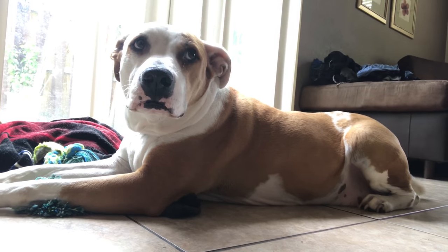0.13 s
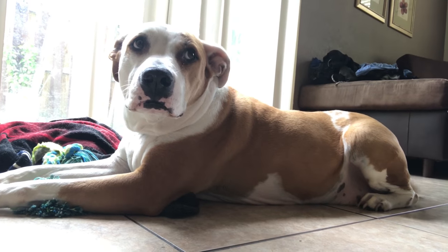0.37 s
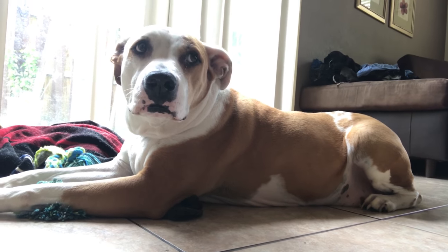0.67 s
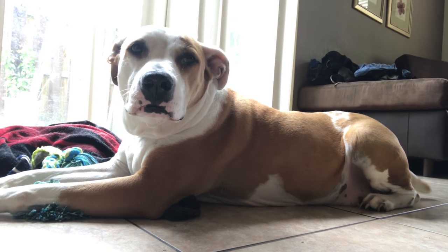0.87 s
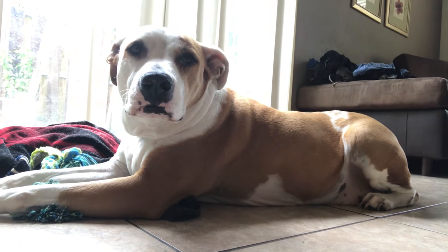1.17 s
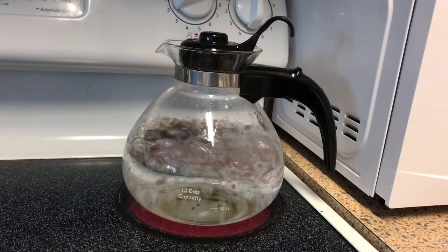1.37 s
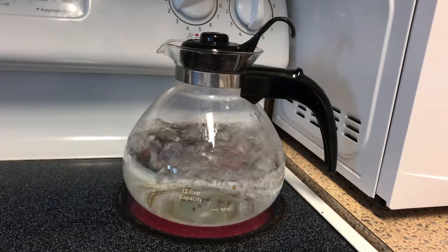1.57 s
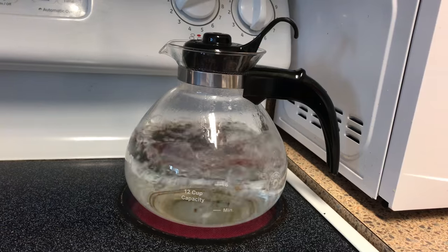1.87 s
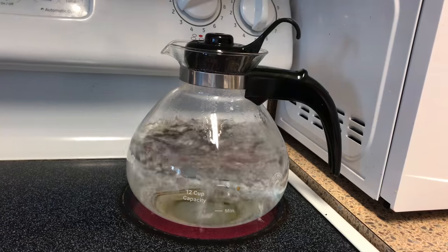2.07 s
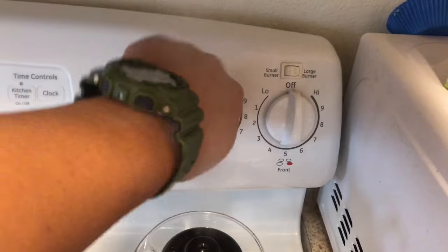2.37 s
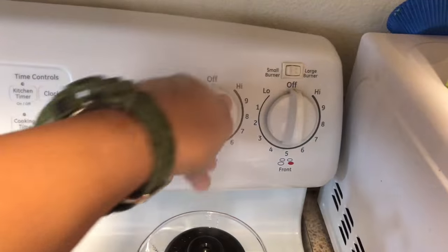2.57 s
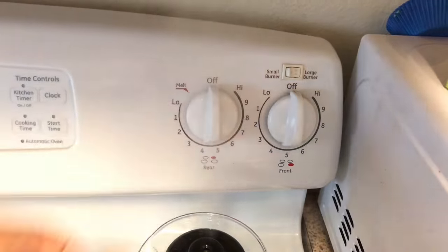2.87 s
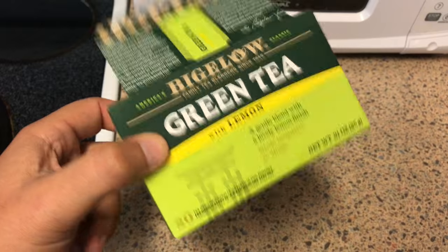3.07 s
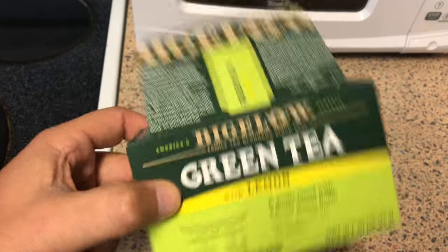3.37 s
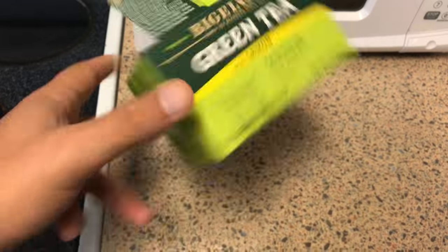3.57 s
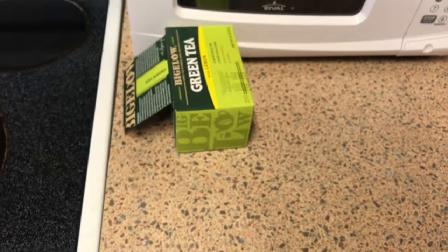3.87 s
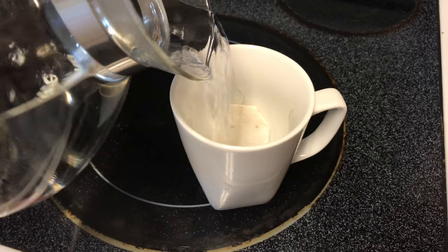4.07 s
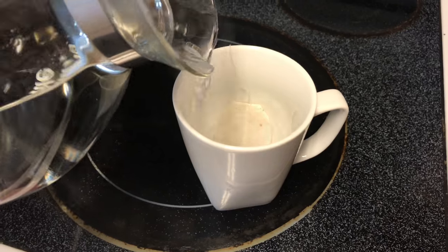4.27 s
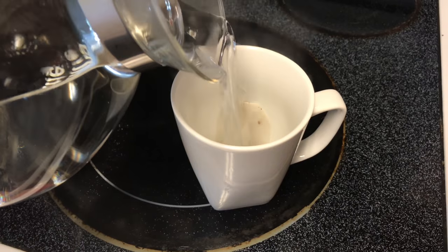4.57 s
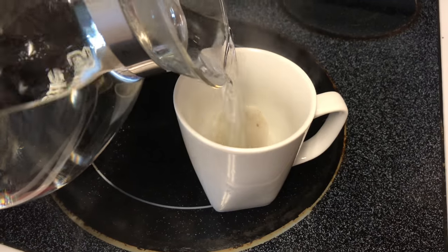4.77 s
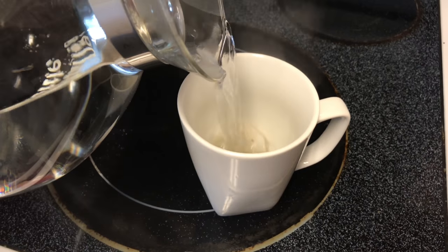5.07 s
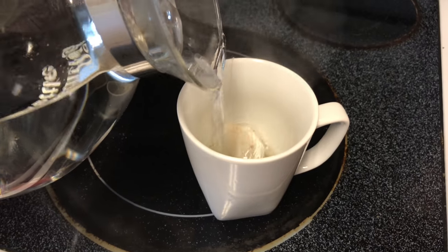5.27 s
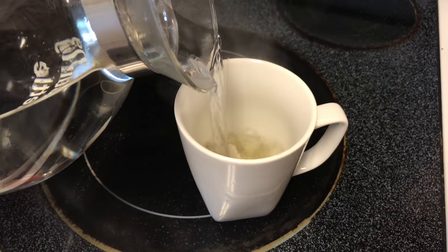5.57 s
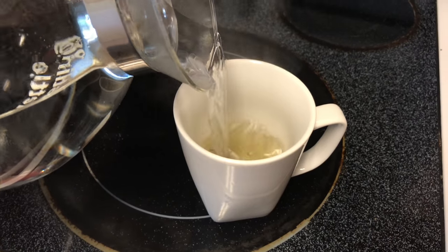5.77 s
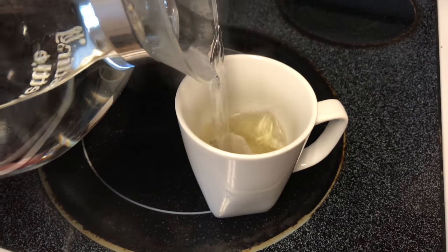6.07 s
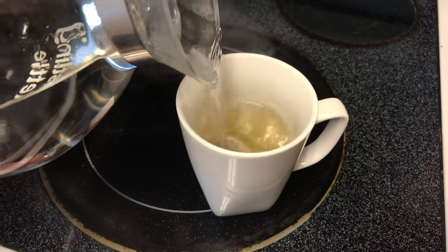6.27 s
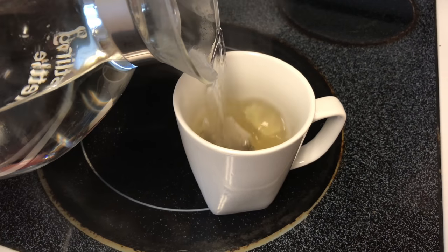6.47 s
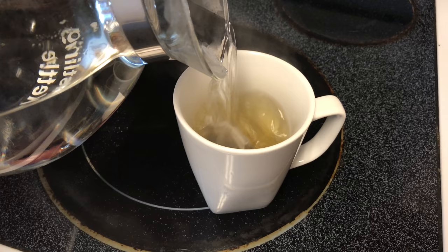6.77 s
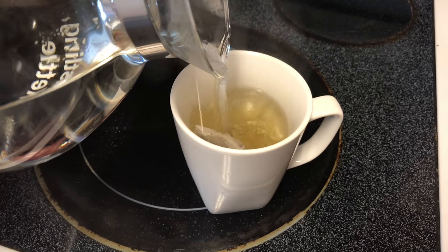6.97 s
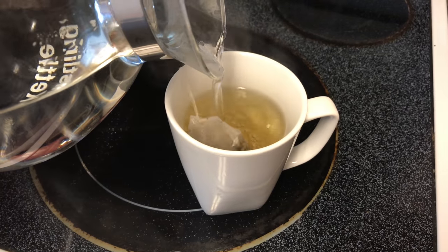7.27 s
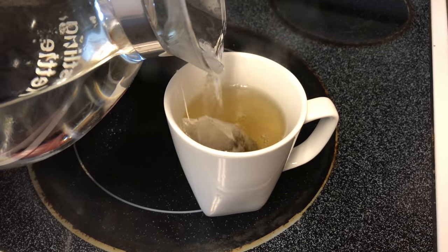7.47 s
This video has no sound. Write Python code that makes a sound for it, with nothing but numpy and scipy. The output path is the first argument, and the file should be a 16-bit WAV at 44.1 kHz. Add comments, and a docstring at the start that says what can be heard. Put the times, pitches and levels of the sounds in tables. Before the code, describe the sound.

Piercing, fluttering kettle whistle cut by a knob's sharp snap, brief box rubbing and a hard drop on the counter, then hot water splashing into a cup.

```python
"""A kettle whistles at the boil: a wandering steam-jet tone with overtones, a beating cap mode and hiss.
A stove knob clicks off: noise bursts excite the modes of the panel. A cardboard box is rubbed, tapped and
dropped: friction noise and impacts drive the modes of box and counter. Last, hot water trickles into a mug:
ringing bubbles and snaps drive its air column and wall. Faint air and mains hum lie under all.
The whistle fades out and in once; short fades also part stove, counter and mug."""
import sys
import numpy as np
from scipy import signal
from scipy.io import wavfile
from scipy.ndimage import uniform_filter1d

SR = 44100
rng = np.random.default_rng(int(sys.argv[2]) if len(sys.argv) > 2 else 0)


def dump(signal):
    """Clip the signal to [-1, 1] and save it as 16-bit WAV at the path in sys.argv[1]."""
    limited = np.clip(np.atleast_2d(signal).T, -1, 1)
    pcm = np.round(limited * 32767).astype(np.int16)
    wavfile.write(sys.argv[1], SR, pcm)


N = 336483  # samples


def amp(db):
    """The decibel law: level to amplitude ratio."""
    return 10 ** (np.asarray(db) / 20)


def evened(x):
    """Normalization to unit rms, so that levels set afterwards are true."""
    return x / np.sqrt(np.mean(abs(x) ** 2) + 1e-20)


def along(rows, column):
    """Linear interpolation of a time table's column at every sample."""
    return np.interp(np.arange(N) / SR, [r[0] for r in rows], [r[column] for r in rows])


def by_hz(points, hz):
    """Interpolation of a spectrum on a logarithmic frequency axis."""
    f, value = np.transpose(points)
    return np.interp(np.log(hz + 1), np.log(f + 1), value)


def wander(rate_hz):
    """Slow random modulation: complex white noise through two one-pole low-passes, of rms 1."""
    r = np.exp(-2 * np.pi * rate_hz / SR)
    white = rng.standard_normal((N, 2)) @ [1, 1j]
    once = signal.lfilter([1], [1, -r], white)
    return evened(signal.lfilter([1], [1, -r], once))


def resonate(x, hz, width):
    """A single resonance by heterodyne: shifts hz down to zero, smooths, shifts back."""
    turn = np.exp(2j * np.pi * np.cumsum(hz * np.ones(len(x))) / SR)
    r = np.exp(-np.pi * width / SR)
    return 2 * (turn * signal.lfilter([1 - r], [1, -r], x / turn + 1e-18)).real


def body(x, peaks):
    """Modal superposition: parallel resonances of alternating sign."""
    return sum((-1) ** k * amp(db) * resonate(x, hz, width) for k, (hz, width, db) in enumerate(peaks))


def treble(x, hz):
    """Second-order high-pass filtering."""
    return signal.sosfilt(signal.butter(2, hz, "high", fs=SR, output="sos"), x)


def dull(x, hz):
    """First-order low-pass filtering."""
    return signal.lfilter(*signal.butter(1, hz, fs=SR), x)


def noise(points, patchy_db):
    """Spectrally shaped noise: random short-time spectra with drifting patches."""
    frames, hz = N // 256 + 5, np.fft.rfftfreq(1024, 1 / SR)
    a, b, patches = rng.standard_normal((frames, 513, 3)).T
    patches = evened(uniform_filter1d(uniform_filter1d(patches, 8, 0), 8, 1))
    spectra = (a + 1j * b) * amp(by_hz(points, hz)[:, None] + patchy_db * patches)
    return signal.istft(spectra, nperseg=1024, noverlap=768)[1][:N]


def burst(s, decay):
    """Impulsive excitation: exponentially decaying noise of peak near 1 from time s [s]."""
    out, t = np.zeros(N + SR // 10), np.arange(SR // 10) / SR
    out[round(s * SR):][:len(t)] = rng.standard_normal(len(t)) / 2 * np.exp(-t / decay)
    return out[:N]


def grains(per_s, spread_db):
    """Random point process: sparse clicks of either sign, a few of them large."""
    size = amp(spread_db * np.minimum(rng.exponential(1, N), 5))
    return size * (rng.random(N) < per_s / SR) * rng.choice([-1, 1], N)


def bubble(hz, cycles, rise):
    """Damped bubble oscillation: a short ring whose pitch rises as it dies."""
    u = np.arange(int(3 * cycles * SR / hz)) * hz / SR  # time in cycles of the starting pitch
    ring = np.sin(2 * np.pi * u * (1 + rise * u / cycles))
    return ring * np.exp(-u / cycles) * np.minimum(2 * u, 1)


def room(x):
    """Reverberation: sparse reflections, each band decaying at its own rate."""
    # decay of the room: (frequency [Hz], time to fall 60 dB [s])
    decay_times = [(100, 0.81), (400, 0.41), (1500, 0.48), (4850, 0.52), (9000, 0.33), (15000, 0.29)]
    taps = np.zeros(SR // 2)
    at = np.arange(120, SR // 2 - 20, 20)
    taps[at + rng.integers(0, 20, len(at))] = rng.choice([-1., 1.], len(at))
    hz, t, z = signal.stft(taps, SR, nperseg=256)
    tail = signal.istft(z * amp(-60 * t / by_hz(decay_times, hz)[:, None]), SR, nperseg=256)[1]
    return signal.fftconvolve(x, tail / np.linalg.norm(tail))[:N]


def kitchen():
    """Ambient noise: broadband air under a mains hum of wavering amplitude."""
    # spectrum shape of the quiet air: (frequency [Hz], relative density [dB])
    air_spectrum = [(18, -28), (30, -7), (93, 4.5), (684, -14), (801, -19.5), (1430, -13), (1720, -23),
                    (2170, -19), (11700, -43.5), (16000, -22.5)]
    # mains hum: (time [s], level [dB])
    hum_levels = [(3.07, -64), (3.59, -59), (3.84, -54), (4.28, -68), (4.62, -59), (5.94, -53),
                  (7.1, -59.5), (7.63, -79)]
    hum_hz, air_db = 58.3, -60
    tone = np.sqrt(2) * np.sin(2 * np.pi * hum_hz * np.arange(N) / SR)
    hum = amp(along(hum_levels, 1) + 1.2 * wander(3).real) * tone
    return hum + amp(air_db) * evened(noise(air_spectrum, 2.2))


def spell(column):
    """Piecewise-steady jet states: a column held until the next spell, with smoothed passages."""
    # spells of the jet: (start [s], flutter depth [Hz], cap mode strength [ratio], breathiness [dB],
    # tone level [dB], hiss level [dB], tilt per overtone above the octave [dB], rasp level [dB])
    jet = [(0, 70, 0.78, 1.5, 0.5, 2, -.5, -45), (.615, 14, 0.85, 5, 0.5, 2.3, 0.26, -54.5),
           (1.89, 55, 0.95, 2, 0.5, 2.5, -1.5, -42), (2.045, 17.3, 0.027, -1.5, 1.5, -0.5, -1.4, -59.5),
           (2.42, 34, 0.32, 2.5, 2, 2.2, -3.5, -30), (2.775, 23, .1, -8.5, 2.5, -0.1, -0.5, -48),
           (2.835, 52, .6, 7, 2, 2.7, -2.5, -34.5)]
    passage_s = .04
    held = np.searchsorted([r[0] for r in jet[1:]], np.arange(N) / SR)
    return uniform_filter1d(np.array(jet, float)[held, column], round(passage_s * SR))


def steam():
    """Turbulence noise: the boil and steam hiss, its level following the spells of the jet."""
    # boil and steam hiss: (frequency [Hz], relative level [dB])
    hiss_spectrum = [(30, -73), (60, -66), (160, -56.5), (300, -65), (500, -66), (900, -75), (2000, -71.5),
                     (2800, -53), (3900, -77), (5500, -58), (7000, -66), (11000, -70.5), (16000, -79)]
    return amp(7 + spell(5)) * noise(hiss_spectrum, 2.83)


def box():
    """Friction and impact: grit rings the hollow box, thuds ring box and counter; gives (rub, thuds)."""
    # modes of the hollow box: (frequency [Hz], width [Hz], gain [dB])
    card = [(312, 46, -4.5), (600, 83, -2.5), (1100, 260, -2), (1730, 410, -7.5), (2350, 470, -16.5),
            (4360, 230, -11.5)]
    # modes of the box on the counter: (frequency [Hz], width [Hz], gain [dB])
    counter = [(275, 66, 2), (340, 220, 3), (560, 96, 6.5), (826, 190, 5.5), (1246, 91, 5.5),
               (1620, 230, 0.5), (1875, 100, 1.5), (2593, 920, -4)]
    # fingers rub the box: (start [s], length [s], drive peak [dB], treble relative to it [dB])
    strokes = [(3.061, 0.073, -41.5, -10), (3.151, 0.14, -39, -5.5), (3.247, 0.052, -45, -3),
               (3.321, 0.064, -28.5, -7), (3.445, 0.043, -43, -9), (3.588, 0.12, -33, -4),
               (3.682, 0.061, -51, 6.5), (3.752, 0.098, -36, -10.5)]
    # taps in the hand, then fall and bounces: (time [s], drive peak [dB], treble relative to it [dB])
    impacts = [(3.216, -34, -13), (3.272, -36, -10), (3.349, -21, -15.5), (3.47, -36, -12),
               (3.647, -36, -23.5), (3.684, -24.5, -12.5), (3.713, -29, -4.5), (3.724, -27.5, -11),
               (3.766, -31, -6), (3.781, -27.5, -9.5), (3.797, 1, -12), (3.804, 6.5, -7.5), (3.811, 1, -13),
               (3.823, -8.5, -17), (3.844, -0.5, -8.5), (3.852, -15, -3), (3.925, -17, -8)]
    fall_s = 3.79  # the box leaves the hand
    rustle_db, stroke_power = -62.5, 2.5  # faint creak of the held box; sharpness of a stroke's arch
    t = np.arange(N) / SR

    grit = (rng.standard_normal(N) + 0.93 * grains(1400, 1.5)) * amp(7.2 * wander(52).real)
    rub_low = amp(rustle_db) * (t < fall_s)
    rub_high = rub_low
    for s, length, db, treble_db in strokes:
        arch = amp(db) * np.sin(np.pi * np.clip((t - s) / length, 0, 1)) ** stroke_power
        rub_low = rub_low + arch
        rub_high = rub_high + arch * amp(treble_db)
    rub = rub_low * evened(body(grit, card)) + rub_high * evened(treble(np.cumsum(grit), 2500))

    low, high = 0, 0
    for s, db, treble_db in impacts:
        puff = amp(db) * burst(s, 0.0057)
        low = low + puff
        high = high + puff * amp(treble_db)
    held, fallen = low * (t < fall_s), low * (t >= fall_s)
    boom = amp(3) * resonate(treble(abs(low), 90), 177, 66)  # a low boom follows every impact, loudest when the box falls
    knock = treble(body(fallen, counter) + 0.43 * dull(fallen, 2000), 120)
    thuds = amp(20.5) * body(held, card) + amp(12.5) * knock + boom + amp(2.0) * treble(high, 2500)
    return rub, thuds


def trickle(column_hz, wall):
    """Bubble acoustics: clumped bubbles and snaps drive the mug's air column and wall."""
    # the trickle: (time [s], water level [dB], spatter relative to it [dB])
    flow = [(4.23, -68, -12), (4.26, -59, 6), (4.39, -64.5, 5), (4.44, -100, -7), (4.52, -90, -5),
            (4.55, -70, 3), (4.62, -50.5, -2), (4.87, -41, -9.5), (5.0, -45, -14), (5.1, -48, -2.5),
            (5.55, -47, -12), (5.9, -53, -6), (6.31, -53, -10), (6.7, -56.5, -5), (6.85, -56, -7),
            (6.99, -50.5, -9.5), (7.1, -56.5, -11), (7.45, -62.5, -5), (7.52, -51, -9.5), (7.63, -60.5, -6)]
    clumps = amp(4.5 * wander(32.0).real)
    fizz = sum(signal.oaconvolve(grains(240, 4.8), bubble(hz, 3.6, 0.108))[:N]
               for hz in np.geomspace(650, 6000, 16)) * clumps
    snaps = signal.oaconvolve(grains(900, 5.8) * clumps, burst(0, 0.0002)[:600])[:N]
    droplets = sum(signal.oaconvolve(grains(47, 2.25), bubble(hz, 5.8, 0.11))[:N]
                   for hz in np.geomspace(4000, 13000, 10)) * clumps
    drive = .9 * evened(fizz) + .65 * evened(snaps)

    # rising water damps the wall by 4 dB a second, down to a limit of -5 dB
    damp = amp(np.clip(-4 * (np.arange(N) / SR - 4.64), -5, 0))
    unsteady_hz = column_hz * (1 + 0.15 * wander(30).real)
    column_ring = resonate(resonate(drive, unsteady_hz, 280), column_hz, 897)
    wall_ring = damp * (1.15 * body(drive, wall[:3]) + 0.21 * evened(fizz))
    water = evened(1.04 * column_ring + wall_ring)

    snaps = evened(snaps)
    spray = dull(snaps, 13000) * .5 + 0.47 * evened(droplets) + 1.3 * body(snaps, wall[3:])
    spatter = evened(treble(spray, 4200))
    started = np.arange(N) > flow[0][0] * SR
    return treble(amp(along(flow, 1)) * (water + amp(along(flow, 2)) * spatter) * started, 120)


def splashes(column_hz, wall):
    """Single bubble events: loud splashes with slap and spray, and glugs, ring in the mug."""
    # loudest splashes: (time [s], drive level [dB], starting pitch [Hz], spray relative to drive [dB])
    loudest = [(4.241, -39, 786, -12.5), (4.263, -36, 8440, 8), (4.314, -39, 736, -4),
               (4.375, -25.5, 6930, -2.5), (4.409, -27, 1930, -33), (4.538, -24.5, 2480, 1),
               (4.585, -40.5, 920, 21), (4.636, -20, 3320, -6), (4.659, -26, 980, 2),
               (4.775, -16.5, 2650, -1.5), (4.805, -31.5, 810, 9.5), (4.842, -20.5, 2110, -8),
               (4.88, -19.5, 1620, -3), (4.969, -32, 1100, -22), (5.023, -19, 1070, -30),
               (5.062, -28.5, 1050, 10), (5.136, -21, 1080, -5.5), (5.181, -19, 1260, -10),
               (5.352, -25, 1030, 0.5), (5.469, -26.5, 1020, -21), (5.57, -26.5, 1080, -7),
               (5.625, -26, 1080, -3), (5.776, -32, 1114, -21), (5.808, -27.5, 1070, -15),
               (6.31, -27, 1517, -8), (6.472, -38, 1294, 10), (6.763, -25, 5190, -3), (6.797, -24, 1230, 5),
               (6.869, -23, 3370, -5), (6.933, -31, 1292, 6.5), (7.214, -31, 1910, -2),
               (7.502, -28, 1640, -2), (7.603, -33.5, 1620, 1.5)]
    # air enters the kettle: (time [s], drive level [dB], starting pitch [Hz])
    glugs = [(6.894, -48, 219), (6.959, -42.5, 470), (7.014, -57, 476)]
    big, slap, spray = np.zeros(N + SR), 0, 0
    for s, db, hz, spray_db in loudest:
        ring = amp(db - 4.5) * bubble(hz, 2.6, 0.088)
        big[round(s * SR):][:len(ring)] += ring
        slap = slap + amp(db) * burst(s, 0.0013) * 0.47
        spray = spray + amp(db + spray_db) * burst(s, 0.0023)
    for s, db, hz in glugs:
        ring = amp(db) * bubble(hz, 8, 0.0077)
        big[round(s * SR):][:len(ring)] += ring
    big = big[:N] + 2.1 * body(slap, wall[1:3]) + dull(treble(spray, 3500), 8700)
    return big + 0.25 * resonate(big, column_hz, 160)


def pour():
    """Air-column resonance: the column shortens and its pitch climbs as the mug fills."""
    # air column of the mug: (time [s], frequency [Hz])
    column = [(4.2, 776), (5.0, 990), (6.0, 1200), (7.63, 1462)]
    # modes of the mug wall: (frequency [Hz], width [Hz], gain [dB])
    wall = [(347, 66, 6), (1795, 237, 4), (3330, 440, 2.5), (5270, 200, 8), (7463, 390, 3.5),
            (9500, 1420, -13)]
    column_hz = along(column, 1)
    return trickle(column_hz, wall) + splashes(column_hz, wall)


def knob():
    """Impact excitation: each detent snap is a sharp crack and knocks the panel's modes."""
    # the detent snaps and chatters: (time [s], drive peak [dB])
    detents = [(2.581, 5), (2.587, -0.5), (2.589, -20.5), (2.593, -1.5)]
    # modes of the stove panel: (frequency [Hz], width [Hz], gain [dB])
    panel = [(302.8, 280, 1.5), (492, 480, 2.5), (740, 280, 4), (1450, 440, -8), (1896, 82, -0.5),
             (2930, 510, -5), (5850, 900, -11), (6940, 420, -1)]
    drive = sum(amp(db) * burst(s, .0035) for s, db in detents)
    return 0.67 * treble(drive, 2400) + 4.94 * treble(body(drive, panel), 250)


def whistle():
    """Jet oscillation: a note with overtones beats with a cap mode, fringed by turbulence."""
    # the note drifts with the steam pressure: (time [s], pitch [Hz])
    pitch = [(0, 2590), (.1, 2662), (.22, 2680), (.3, 2612), (.45, 2658), (.52, 2630), (.56, 2580),
             (.62, 2706), (.77, 2715), (.85, 2750), (1.03, 2694), (1.05, 2787), (1.125, 2669), (1.15, 2773),
             (1.23, 2800), (1.41, 2650), (1.43, 2794), (1.55, 2712), (1.67, 2680), (1.69, 2750),
             (1.83, 2728), (1.86, 2680), (2.02, 2655), (2.04, 2435), (2.1, 2357), (2.24, 2445),
             (2.37, 2350), (2.41, 2506), (2.47, 2614), (2.51, 2717), (2.525, 2360), (2.58, 2584),
             (2.62, 2723), (2.68, 2603), (2.74, 2620), (2.87, 2609), (2.91, 2750), (2.96, 2592),
             (3.06, 2562)]
    # the jet slips to another note and back: (start [s], length [s], step [Hz])
    slips = [(0.034, .028, -130), (0.079, .018, -88), (0.231, .021, -190), (0.261, 0.035, -110),
             (0.329, 0.06, -100), (0.401, .028, -170), (.457, 0.015, -130), (0.487, 0.047, -225),
             (0.782, .032, 121.5), (1.897, 0.018, -210), (1.963, .04, -170), (2.133, 0.021, 142.5),
             (2.291, 0.012, 95), (2.777, 0.055, -230)]
    # spout and walls favour some notes: (pitch [Hz], level of all partials but the octave [dB],
    # octave level [dB])
    favour = [(2350, -28, -19), (2395, -31.5, -18), (2470, -28, -20.5), (2538, -41, -23.5),
              (2620, -27, -16), (2680, -27, -19.5), (2750, -28, -26.5), (2800, -27, -19), (3018, -35, 7)]
    # overtones: (multiple of the pitch, level [dB], upper side tone relative to the note [dB],
    # lower side tone [dB], breathy fringe [dB])
    overtones = [(1, 2.5, -16.5, -44.5, -23.5), (2, -2, -10, -7.5, -12.5), (3, -5, -5.5, -14.5, -12),
                 (4, -6.5, -9.5, -11.5, -13), (5, -22.5, -3.5, -10, -10)]
    # random level: (fundamental [dB], overtones [dB])
    waver_db = (0.9, 2)
    # fixed resonances of spout and lid: (frequency [Hz], width [Hz], gain [dB])
    spout = [(2450, 200, -4), (3200, 200, 0), (4980, 160, 0), (5350, 130, 0), (5900, 140, 3),
             (7550, 200, 0), (8680, 200, 2)]
    cap_hz, cap_width = 3180, 130  # second mode of the cap
    glide_share = 0.2  # part of a slip over which it glides
    fill = .7  # how far breath fills in where the note is weak (0-1)
    t = np.arange(N) / SR

    slip = 0
    for s, length, step in slips:
        inside = np.minimum(t - s, s + length - t)
        slip = slip + step * np.clip(.5 + inside / (glide_share * length), 0, 1)
    flutter = spell(1) * np.tanh(5.54 * wander(65).real)
    hz = along(pitch, 1) + slip + flutter / (1 + (slip / 110) ** 2)  # a slipped note holds
    turn = np.exp(2j * np.pi * np.cumsum(hz + 14 * wander(20).real) / SR)

    notes, *levels = np.transpose(favour)
    smooth_hz = uniform_filter1d(hz, round(0.0042 * SR))
    note_db, octave_db = (np.interp(smooth_hz, notes, db) + spell(4) for db in levels)
    steady = np.clip(1.5 - spell(1) / 30, 0, 1)  # 1 where the flutter is shallow
    cap = wander(cap_width / 2) * np.exp(2j * np.pi * cap_hz * t)
    beat = np.clip(spell(2), 0, 3) * cap / turn  # turns at the difference frequency

    out = 0
    for k, db, up_db, down_db, fringe_db in overtones:
        k = round(k)
        level_db = octave_db if k == 2 else note_db
        tilt_db = max(k - 2, 0) * spell(6)
        note = amp(level_db + db + tilt_db + waver_db[k > 1] * wander(38).real)
        upper = amp(up_db) * beat
        lower = amp(down_db) * (0.26 + 0.64 * steady) * beat.conj()
        fill_db = fill * (level_db[t < pitch[-1][0]].mean() - level_db)
        fringe = amp(fringe_db + spell(3) + fill_db) * wander(300 + 40 * k)
        out = out + note * (turn ** k * (1 + upper + lower + fringe)).real

    # steam rasps in the spout
    rasp = resonate(resonate(rng.standard_normal(N), 2900, 650), 2900, 650)
    out = out + amp(spell(7) + 6.2 * wander(26).real) * evened(rasp)
    return out + 0.71 * sum(amp(db) * resonate(out, f, width) for f, width, db in spout)


def scene():
    """Superposition of direct and reverberant sound: stove, counter and mug in turn."""
    # fades between and within the parts: (time [s], fade-out length [s], fade-in length [s])
    fades = [(2.383, 0.032, 0.032), (3.054, 0.047, 0.0093), (4.12, 0.0203, 0.03)]
    t = np.arange(N) / SR
    song, click, (rub, thuds), water = whistle(), knob(), box(), pour()
    stove = song + amp(-12) * room(song) + steam() + click + amp(-10) * room(dull(click, 4300))
    counter = rub + thuds + amp(-8.5) * room(rub) + amp(-11.0) * room(thuds)
    mug = water + amp(-9.5) * room(water)
    mix = np.select([t < fades[1][0], t < fades[2][0]], [stove, counter], mug) + kitchen()
    for s, out_s, in_s in fades:
        mix = mix * np.clip(np.where(t < s, (s - t) / out_s, (t - s) / in_s), 0, 1)
    return mix[None]


def record(dry):
    """Band limitation and saturation: deepest bass drops, loud peaks round off, top is cut."""
    rounded = np.tanh(0.78 * treble(dry, 36)) / 1.09
    low_pass = signal.firwin(255, 16100, window=("kaiser", 9), fs=SR)
    return signal.oaconvolve(rounded, low_pass[None], "same")


dry = scene()
out = record(dry)
dump(out)
```